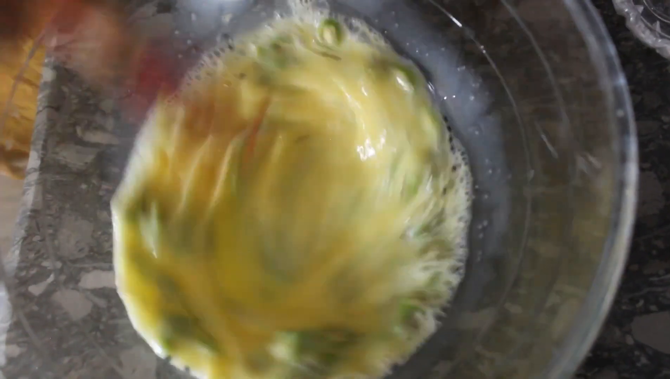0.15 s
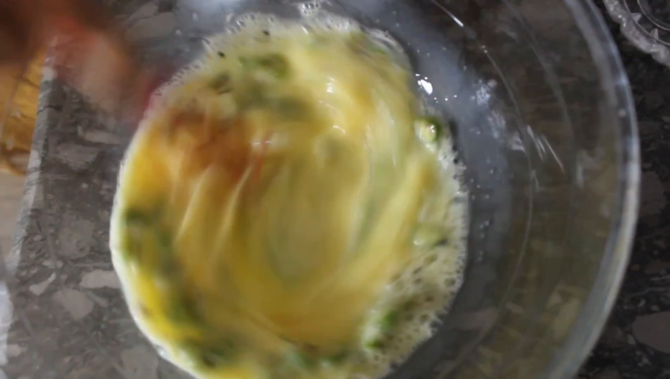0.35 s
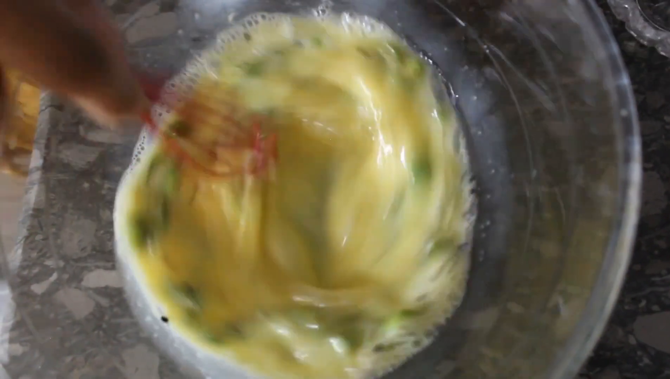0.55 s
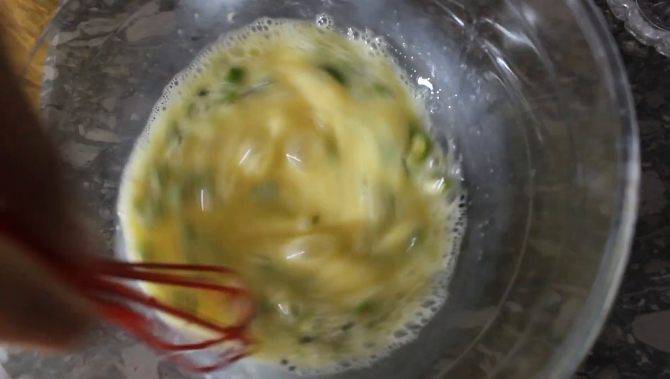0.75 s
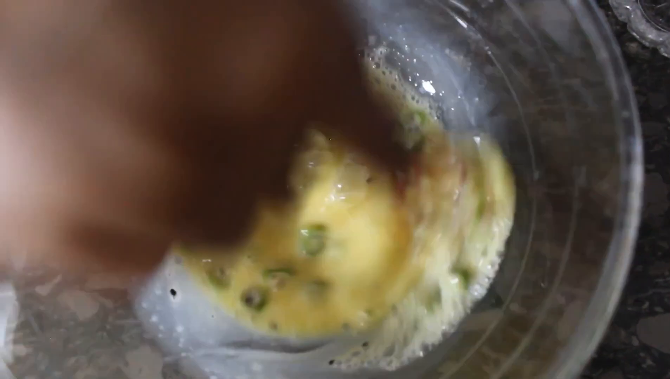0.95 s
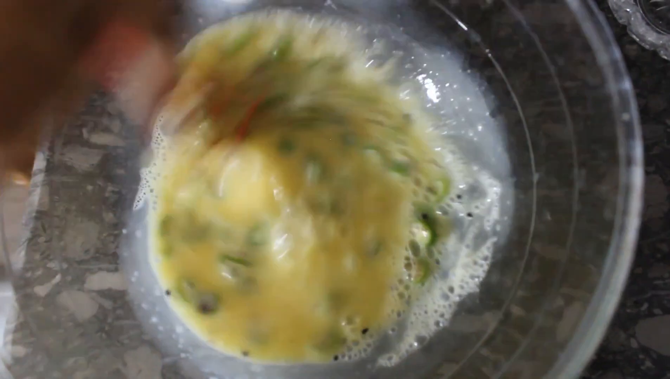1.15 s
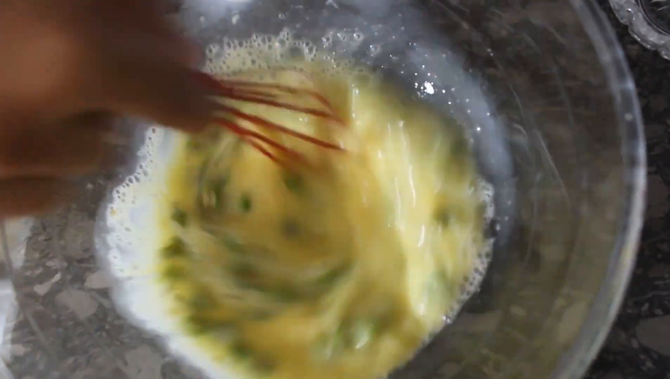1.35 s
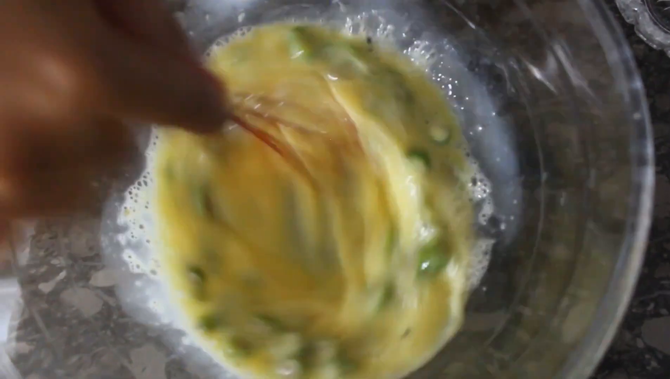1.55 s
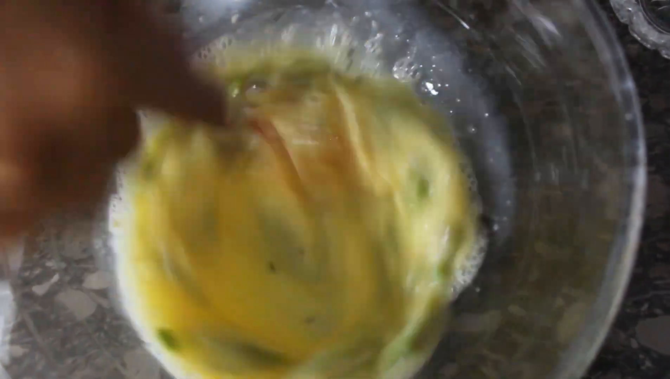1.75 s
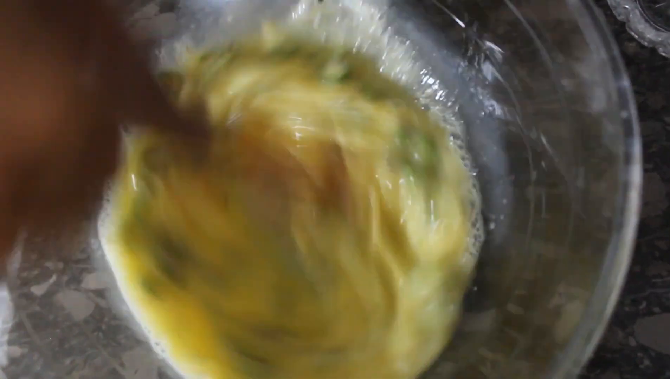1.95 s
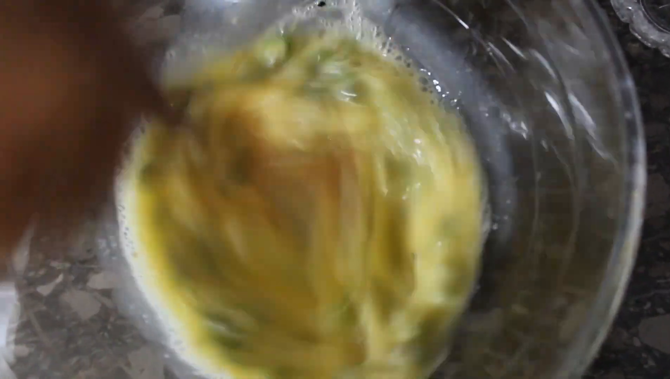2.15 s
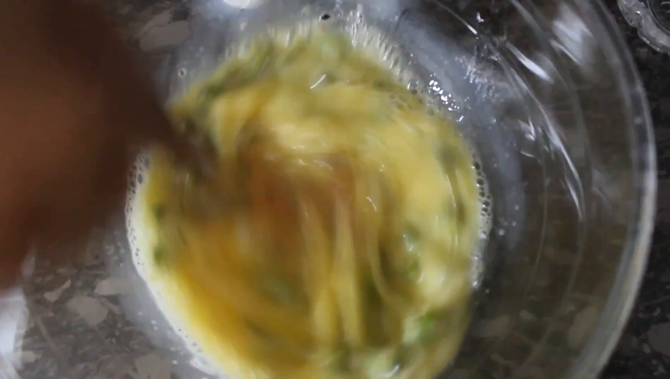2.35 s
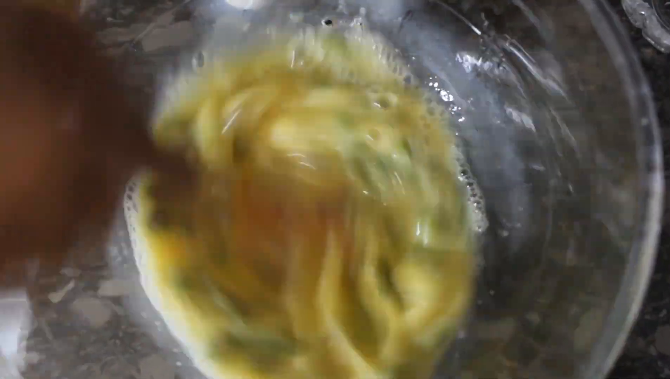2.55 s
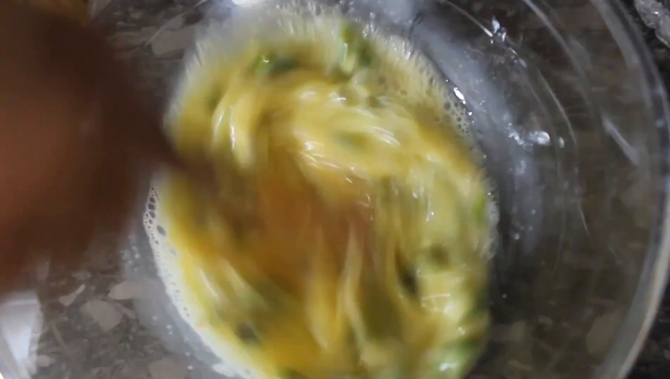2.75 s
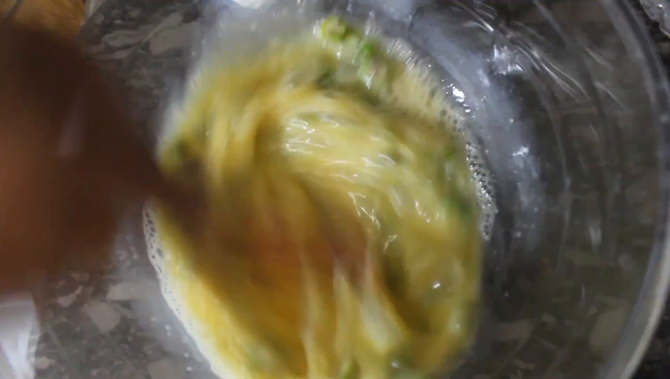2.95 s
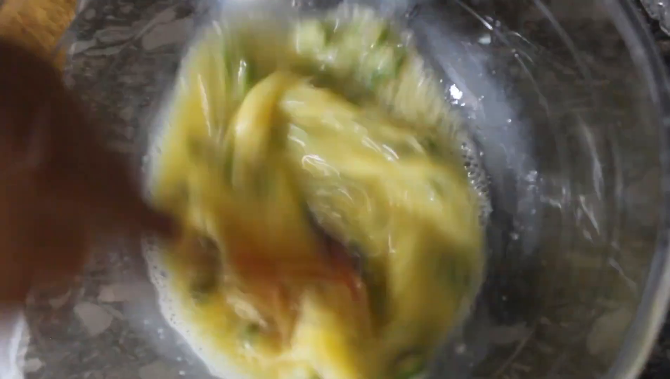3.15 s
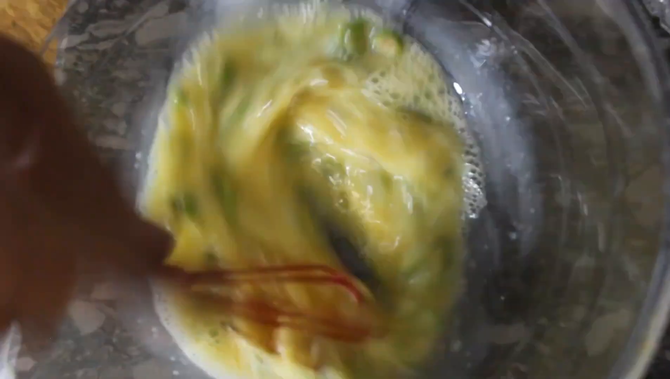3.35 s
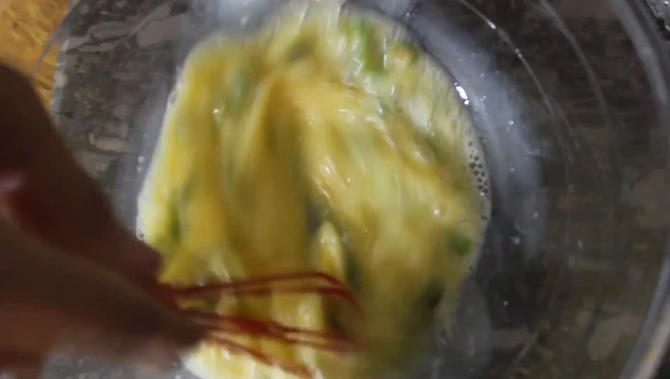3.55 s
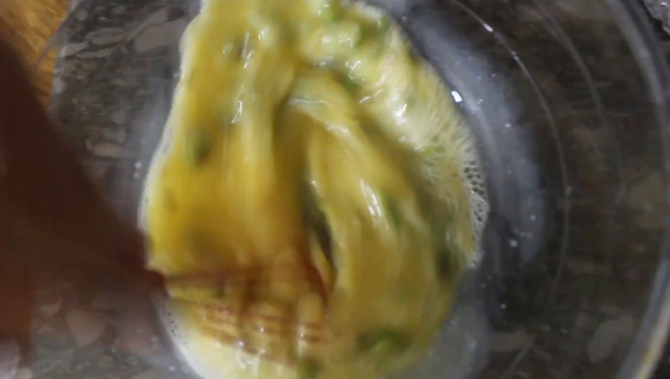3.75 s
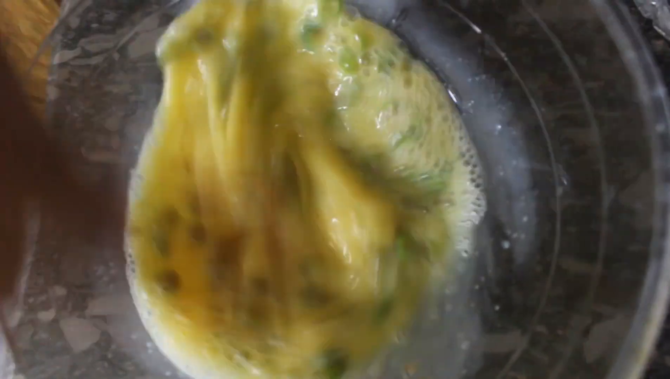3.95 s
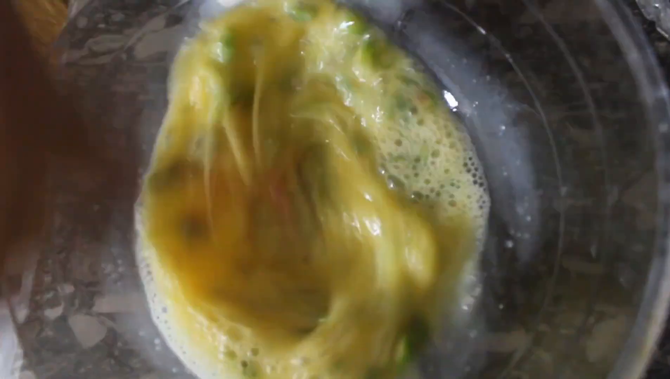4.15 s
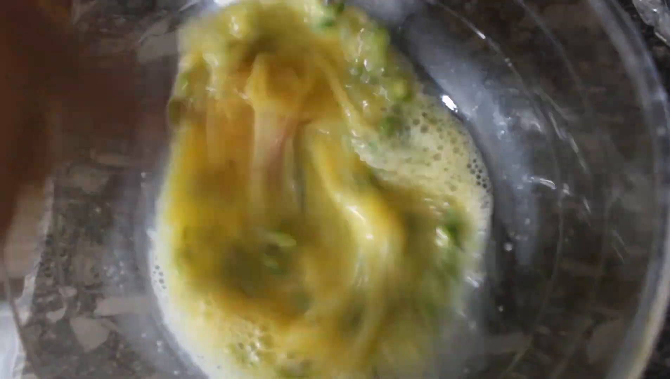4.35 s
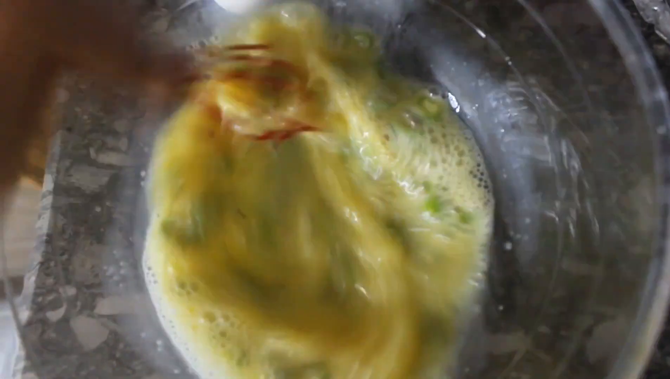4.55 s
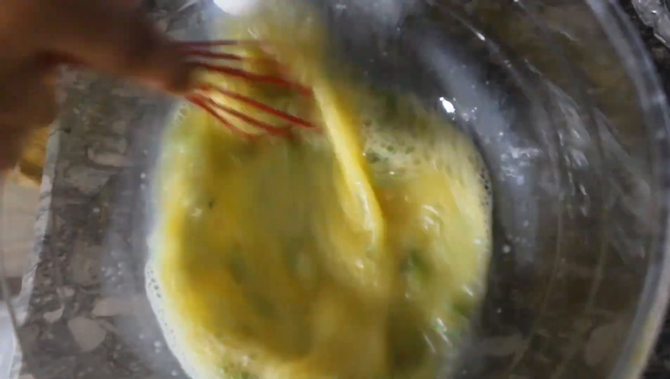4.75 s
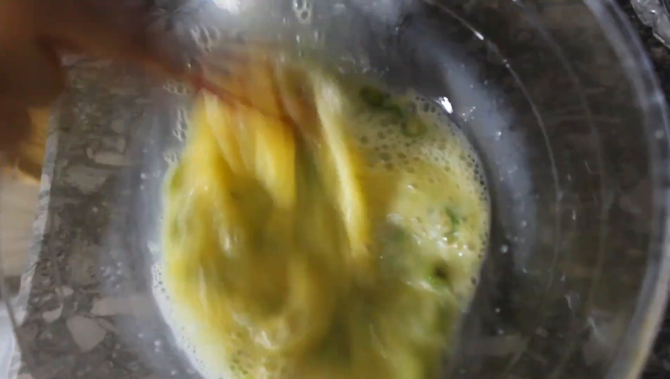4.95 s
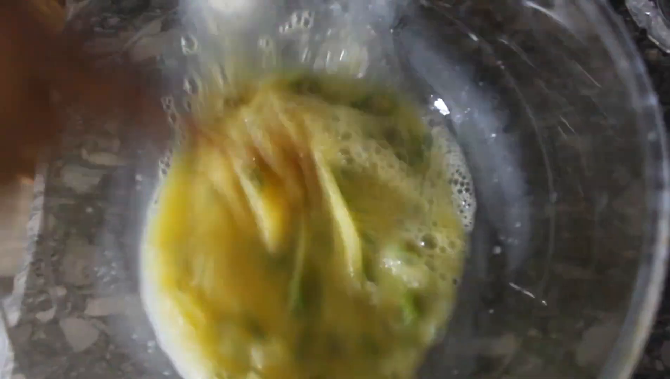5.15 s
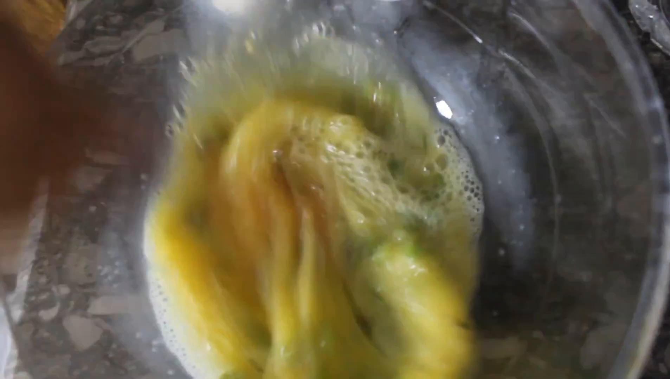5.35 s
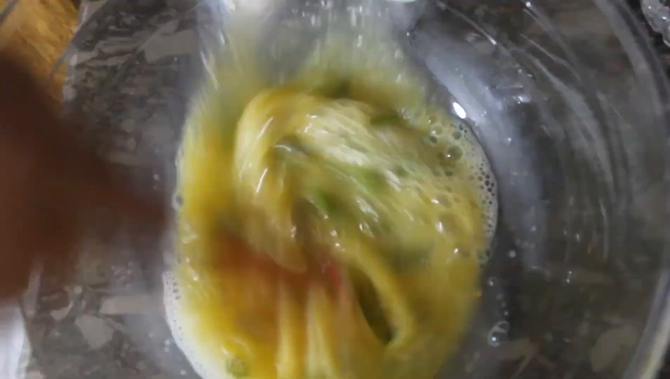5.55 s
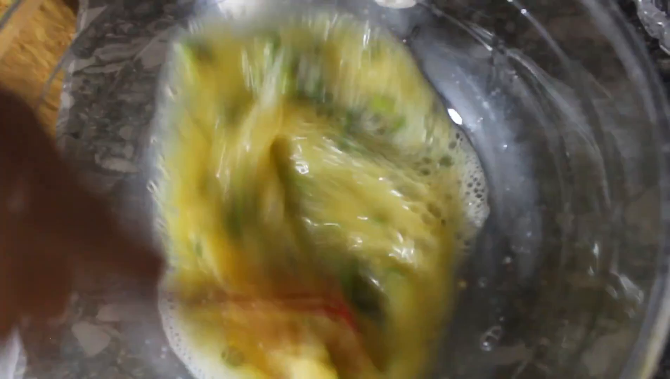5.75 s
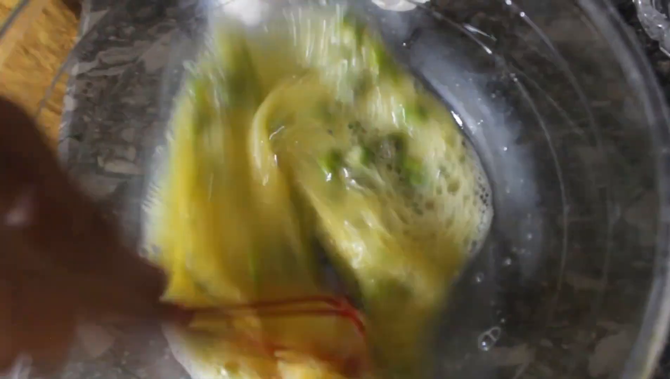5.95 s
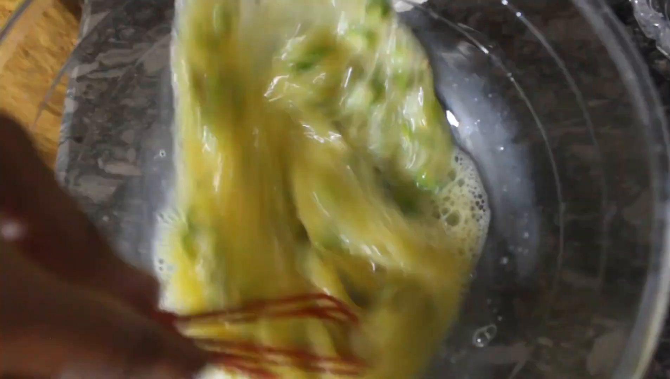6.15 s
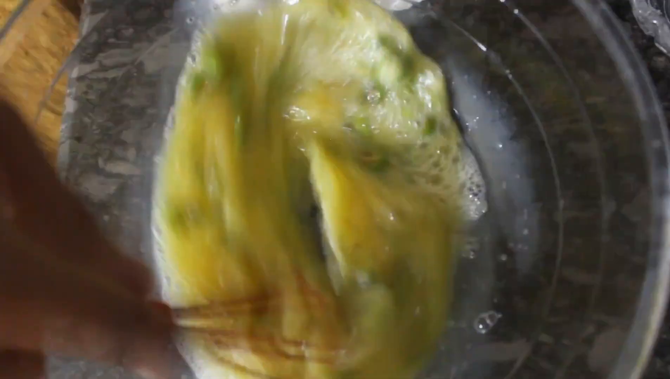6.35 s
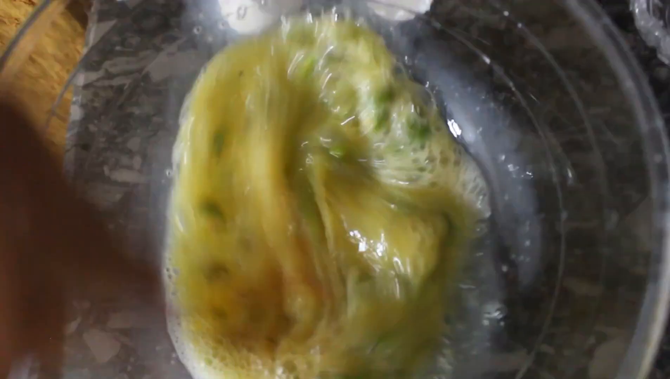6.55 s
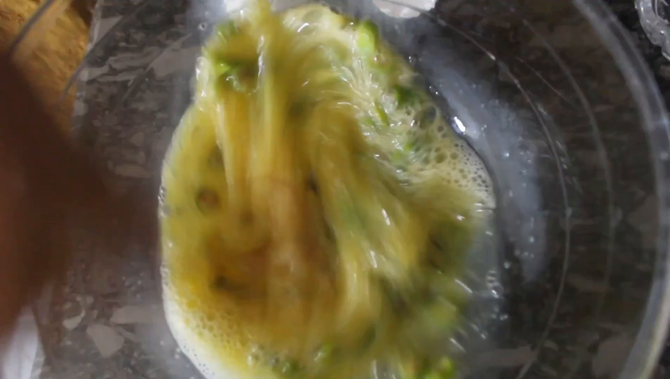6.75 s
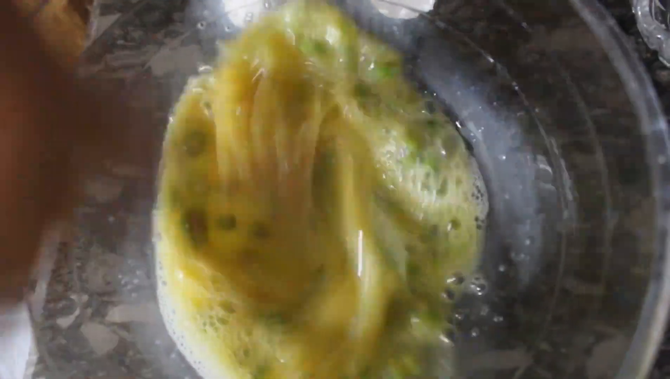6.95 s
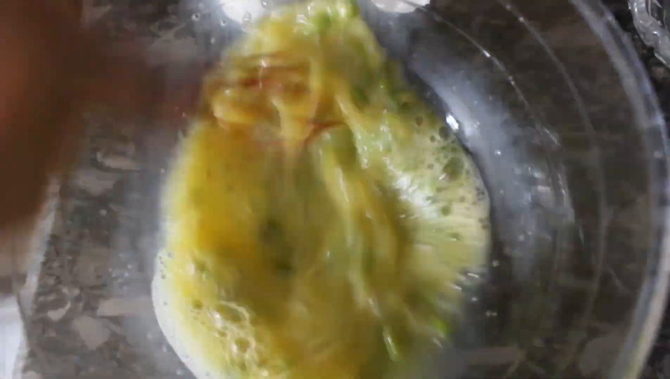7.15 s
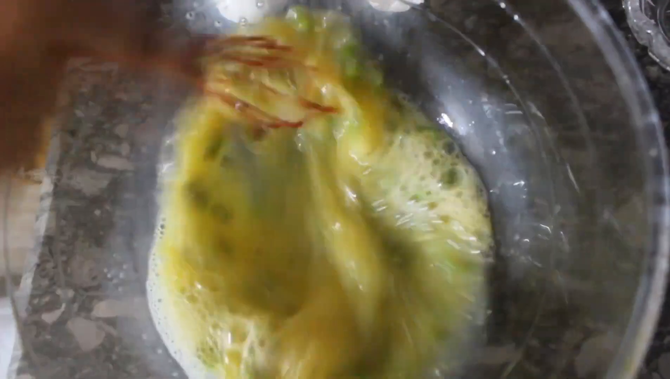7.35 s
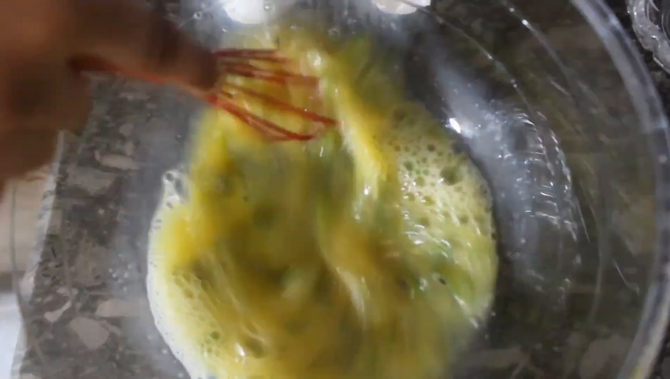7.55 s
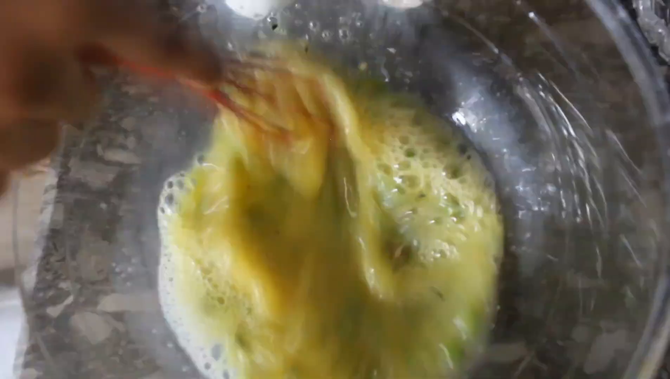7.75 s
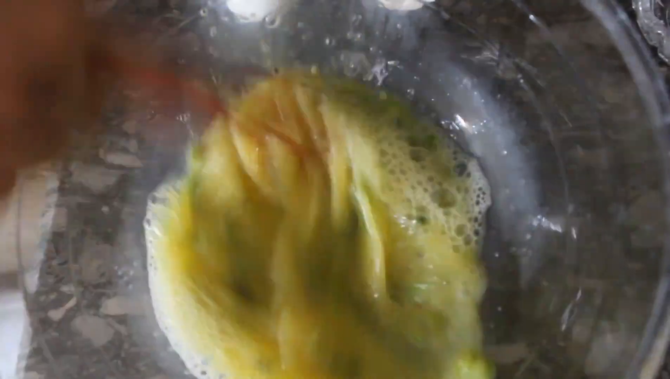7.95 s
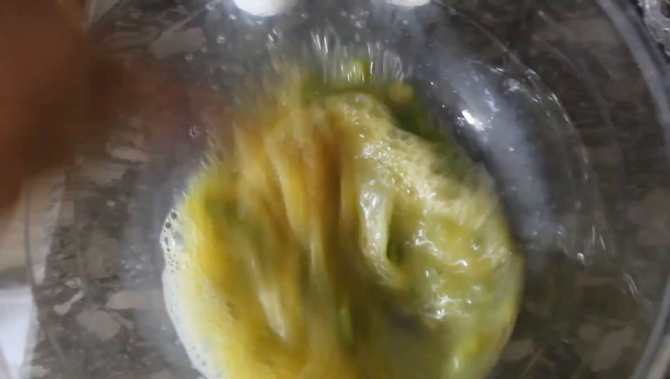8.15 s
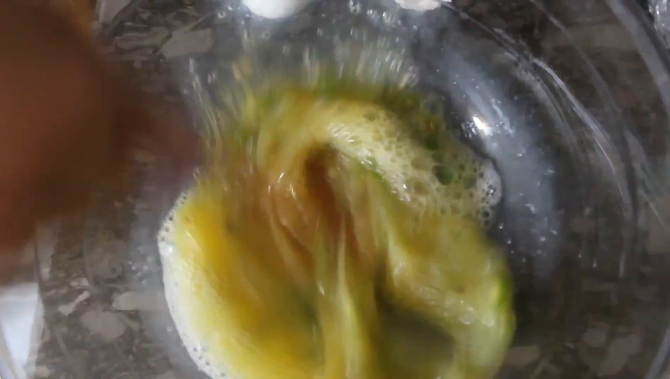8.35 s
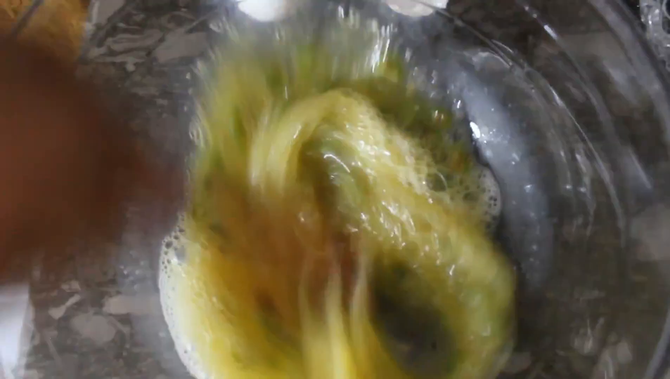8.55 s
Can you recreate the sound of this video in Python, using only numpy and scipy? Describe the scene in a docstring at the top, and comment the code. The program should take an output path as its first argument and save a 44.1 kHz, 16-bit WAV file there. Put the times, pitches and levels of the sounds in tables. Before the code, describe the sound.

A brief clatter like a dropped marble settling on stone opens the scene, then near quiet with tiny drips. Soft whisk passes and a dull bump follow, and from about two seconds eggs are beaten hard and fast in a glass bowl: squelching, fizzy strokes, hollow bubble pops and wire clicks, continuing to the end. Very close microphone, short indoor echo, low kitchen hum, slightly overloaded peaks.

```python
"""In a humming kitchen a wire whisk beats eggs in a glass bowl on a stone counter, heard from close by.
Air pockets pop, wires ping and a few knocks sound as short tones amid a spray of small bubbles.
Something small and hard taps the counter and rattles to rest at the start: a cluster of dying tones.
Noise bursts make sharp ticks: the object's hits and small drips at first, later wire on glass.
Dull bumps and one clink are dying tones too; rumble, hum and room air lie behind, and loud peaks overload."""
import sys
import numpy as np
from scipy import signal
from scipy.fft import rfft, irfft, next_fast_len
from scipy.io import wavfile
from scipy.ndimage import uniform_filter1d

SR = 44100
rng = np.random.default_rng(int(sys.argv[2]) if len(sys.argv) > 2 else 0)


def generate_wav(sig):
    """Save sig (samples, or channels by samples) to the path in sys.argv[1] as 16-bit PCM at SR."""
    pcm = np.round(np.clip(np.atleast_2d(sig).T, -1, 1) * 32767).astype(np.int16)
    wavfile.write(sys.argv[1], SR, pcm)


N = 382781  # length in samples


def gain_of(db):
    """Turns dB into a factor."""
    return 10 ** (np.asarray(db) / 20)


def evened(x):
    """Scales a sound to an rms of 1."""
    return x / np.sqrt(np.mean(x ** 2) + 1e-20)


def read_spectrum(points, hz):
    """Reads a table of (Hz, value) at any frequency, in straight lines along log frequency."""
    f, value = np.transpose(points)
    return np.interp(np.log(hz + 1), np.log(f + 1), value)


def read_over_time(s, values):
    """Reads values given at certain seconds, for every sample of the scene."""
    return np.interp(np.arange(N) / SR, s, values)


def add(mix, s, sound):
    """Adds a sound to the mix at s seconds, cut off at the end of the mix."""
    part = mix[max(round(s * SR), 0):][:len(sound)]
    part += sound[:len(part)]


def coloured(x, spectrum):
    """Filters a sound by a table of (Hz, dB)."""
    size = next_fast_len(len(x))
    gain = gain_of(read_spectrum(spectrum, np.fft.rfftfreq(size, 1 / SR)))
    return irfft(rfft(x, size) * gain, size)[:len(x)]


def ring(hz, t60, glide, rise):
    """A tone with a soft start that falls 60 dB in t60 seconds; a positive glide lifts its pitch."""
    t = np.arange(int(abs(t60) * SR) + 40) / SR
    envelope = (1 - np.exp(-t / rise)) ** 2 * gain_of(-60 * t / t60)
    return envelope * np.sin(2 * np.pi * hz * (t + glide * t ** 2 / t60))


# Short pitched sounds, loud and faint: air pockets popping, wires pinging, a few knocks.
# Each row: start in seconds, peak level in dB, pitch in Hz.
SHORT_TONES = [(.4324, -18, 4200), (0.4996, -21, 4100), (.5346, 0, 1620), (.543, -6.5, 2500),
               (.544, -3.5, 3200), (.6564, -27, 4450), (.7352, -22, 4270), (.995, -17, 2300),
               (1.1376, -13.5, 5240), (1.317, -8, 3460), (1.392, -2, 3850), (1.4566, 0.3, 3750),
               (1.4627, -11, 740), (1.6677, 2, 2920), (1.8376, 1, 2170), (1.901, -11.5, 3060),
               (1.949, -10, 3250), (1.976, -11, 4040), (2.151, 0, 2310), (2.3452, -4, 2300),
               (2.3614, -5.5, 1075), (2.3746, -2, 787), (2.417, -3, 1630), (2.423, -4.5, 1500),
               (2.4248, -3.5, 2300), (2.4437, -3, 3040), (2.457, -8, 920), (2.4624, -2, 2500),
               (2.499, -14.5, 790), (2.551, -16, 2300), (2.5613, -0.5, 3650), (2.632, -9, 900),
               (2.646, -12.5, 910), (2.649, -7, 2100), (2.652, -7, 3840), (2.6705, -4.5, 2140),
               (2.7555, -4, 2180), (2.7678, 0, 4000), (2.8352, -0.5, 2900), (2.842, 1.5, 5670),
               (2.853, -2, 1850), (2.9638, -1.5, 2210), (2.97, -0.5, 4100), (3.0511, -4, 2010),
               (3.167, -2.5, 2840), (3.1717, -7, 760), (3.2592, -2, 2750), (3.2708, -18, 965),
               (3.275, -1.5, 3770), (3.3934, -6.5, 2300), (3.4212, -0.5, 2160), (3.4707, -7, 2390),
               (3.509, -5, 2320), (3.5976, -1, 2370), (3.609, -3, 4450), (3.672, -10.5, 1110),
               (3.7066, -2, 3700), (3.769, -9, 1460), (3.815, -2, 2300), (3.8233, 0.5, 2260),
               (3.845, -26, 770), (3.862, -10, 2350), (3.8803, -8.5, 1730), (3.923, 1, 2430),
               (4.0481, -14, 2240), (4.0583, -6, 4100), (4.084, -10.5, 2050), (4.1495, -7.5, 2440),
               (4.201, -11.5, 2300), (4.245, -7, 2340), (4.2803, -12, 900), (4.3267, -6.5, 1330),
               (4.338, -2, 4240), (4.3509, -10.5, 984), (4.4748, -1, 2310), (4.4771, -11, 940),
               (4.5188, -4, 1160), (4.5429, 0.5, 2840), (4.5586, -4, 2170), (4.5611, -7, 940),
               (4.575, -5.5, 3060), (4.6877, -3, 2350), (4.696, -3, 2620), (4.7345, -5, 2600),
               (4.7829, -4, 947), (4.909, -3.5, 2290), (4.951, -6.5, 1580), (5.0131, -9, 2390),
               (5.057, -1.5, 2640), (5.1313, -3, 2580), (5.1473, -15.5, 755), (5.1984, -6, 3100),
               (5.261, -4, 1940), (5.4574, -16, 1000), (5.3323, -8, 1430), (5.504, -9.5, 762),
               (5.5559, 0, 4200), (5.6452, -5.5, 860), (5.66, -10, 2350), (5.755, -10, 2300),
               (5.7735, 0, 2420), (5.7908, -7, 750), (5.7988, -1.5, 4120), (5.8163, -4.5, 844),
               (5.8395, -5, 2340), (5.8642, -1.5, 866), (5.9102, -4, 2340), (5.9684, -9, 1460),
               (6.048, -7.5, 1010), (6.0505, -2, 2660), (6.0934, -3, 3980), (6.126, -3, 3130),
               (6.135, -3, 874), (6.204, -3, 2740), (6.283, 0, 3680), (6.3163, -7.5, 2270),
               (6.3877, -8.5, 870), (6.4753, -7.5, 748), (6.5022, -6.5, 765), (6.5124, -5, 2120),
               (6.522, -3.5, 2250), (6.631, -5, 2340), (6.676, -1, 2130), (6.837, -1, 2500),
               (6.8424, -7, 780), (6.848, -3, 2370), (6.905, -8, 2880), (6.926, -8, 2310),
               (6.9341, -4, 850), (6.945, -4.5, 975), (6.9637, -3, 2310), (6.9982, -3.5, 870),
               (7.044, -5.5, 1340), (7.044, -3.5, 2210), (7.0629, -10.5, 783), (7.0667, -6, 3860),
               (7.1394, -11.5, 1020), (7.1407, -1.2, 2300), (7.269, -3, 2290), (7.278, 0, 2850),
               (7.3498, -3.5, 2220), (7.3588, -9.5, 2350), (7.4206, -15, 808), (7.4615, -9, 750),
               (7.484, -0.5, 2280), (7.4932, -5, 1700), (7.4935, -12, 860), (7.5524, -5.5, 1800),
               (7.588, -11, 1070), (7.5957, -4, 2270), (7.616, -6, 2360), (7.691, -2, 2260),
               (7.7045, -13, 890), (7.8043, -9.5, 790), (7.858, -8.5, 1460), (7.9185, -7, 2300),
               (7.919, -3, 857), (7.931, -8, 2260), (8.0098, -8.5, 743), (8.0178, -8.5, 1016),
               (8.0285, 1, 2160), (8.086, -10.5, 2300), (8.109, -12, 2300), (8.126, -5, 2430),
               (8.134, 0.5, 894), (8.2143, -12, 920), (8.2378, -10.5, 740), (8.395, -1.5, 1900),
               (8.4444, 0, 2190), (8.4746, -1.5, 2140), (8.561, -4.5, 1115), (8.6421, 1, 4120),
               (8.6465, -8, 1700), (8.648, -6.5, 1150)]
# Pitches near which the glass rings on.
# Each row: pitch in Hz, width in Hz, seconds added to the dying time.
GLASS_WALL = [(773, 24, 0.021), (965, 43, 0.023), (2300, 79, 0.017)]
# Bubbles that chirp upward, and one steady lingering tone. Each row: start in seconds, level in dB,
# starting pitch in Hz, seconds to fall 60 dB, share of the starting pitch climbed in that time.
CHIRPING_TONES = [(1.654, -40, 730, .06, 1.1), (1.843, -4.5, 1440, 0.065, 0.67),
                  (1.85, -16, 1414, 0.19, 0.033), (2.049, -20, 670, 0.087, 1.9),
                  (2.419, -16, 1490, .04, 0.73), (4.04, -25, 880, .05, .8), (5.524, -12, 1440, .06, 1.3),
                  (7.037, -10, 1500, 0.033, .9)]
POP_CYCLES = 22.2  # cycles until a short tone has died away, without the glass


def pops():
    """Pops, pings and knocks ring for a few cycles, longer near the glass's pitches; chirps climb."""
    out = np.zeros(N)
    for s, db, hz in SHORT_TONES:
        glass_s = sum(more * np.exp(-((hz - f) / width) ** 2) for f, width, more in GLASS_WALL)
        pop = ring(hz, POP_CYCLES / hz + glass_s, glide=0.048, rise=0.51 / hz)
        add(out, s, gain_of(db) * pop / abs(pop).max())
    for s, db, hz, t60, climb in CHIRPING_TONES:
        add(out, s, gain_of(db) * ring(hz, t60, glide=climb / 2, rise=0.00059))
    return out


def bubbles(per_s, spread_db, low_hz, high_hz, cycles, linger):
    """A crowd of short tones at random moments, on 24 pitches; a few are much stronger than the rest."""
    happens = rng.random(N) < per_s / SR
    size = gain_of(spread_db * np.minimum(rng.exponential(1, N), 3.5)) * happens
    kind, out = rng.integers(0, 24, N), np.zeros(N)
    for k, hz in enumerate(np.geomspace(low_hz, high_hz, num=24)):
        grain = ring(hz, cycles / hz + linger, glide=0.13, rise=0.35 / hz)
        grain *= np.sqrt(hz) / np.linalg.norm(grain)
        out += signal.oaconvolve(size * (kind == k), grain)[:N]
    return out


# Whisk strokes through the egg.
# Each row: centre in seconds, force in dB, length in seconds (it stretches the swell).
WHISK_STROKES = [(0.795, -28.5, 0.015), (0.898, -28, 0.024), (1.013, -30.5, 0.17), (1.148, -32, 0.041),
                 (1.33, -36, 0.034), (1.388, -21.5, 0.031), (1.472, -22.5, 0.027), (1.532, -21.5, 0.044),
                 (1.619, -23, 0.068), (1.813, -29, 0.077), (1.951, -26, 0.036), (2.039, -26, .03),
                 (2.143, -15, 0.039), (2.244, -17.5, 0.027), (2.352, -16, 0.054), (2.453, -13.5, 0.034),
                 (2.554, -11, 0.04), (2.652, -15, 0.048), (2.76, -10, .039), (2.854, -13.5, 0.047),
                 (2.967, -13.5, 0.062), (3.061, -12, .053), (3.169, -12, 0.05), (3.272, -16, 0.053),
                 (3.395, -22, .12), (3.481, -16.5, 0.062), (3.608, -10, 0.052), (3.696, -13.5, 0.057),
                 (3.768, -17, .015), (3.824, -14.5, 0.036), (3.917, -16, .042), (4.045, -16.5, 0.046),
                 (4.143, -23, 0.052), (4.256, -15, 0.043), (4.339, -16, 0.093), (4.478, -14, .1),
                 (4.56, -10, 0.032), (4.702, -16.5, 0.058), (4.775, -14, 0.061), (4.901, -15.5, .048),
                 (4.955, -15, .017), (5.009, -12, 0.092), (5.14, -16.5, 0.046), (5.214, -12, 0.096),
                 (5.342, -13, 0.053), (5.443, -12, 0.065), (5.562, -9, 0.024), (5.662, -13, 0.068),
                 (5.789, -14, 0.12), (5.878, -14.5, 0.052), (5.996, -15.5, 0.037), (6.093, -16.5, 0.094),
                 (6.209, -8, 0.046), (6.299, -19.5, 0.084), (6.42, -12.5, 0.054), (6.504, -13, 0.06),
                 (6.633, -22.5, 0.069), (6.736, -14, .061), (6.803, -20, 0.026), (6.844, -12.5, 0.046),
                 (6.939, -13.5, 0.093), (7.054, -17.5, 0.039), (7.158, -17, 0.059), (7.277, -18.5, 0.091),
                 (7.371, -15, 0.051), (7.488, -14, 0.045), (7.587, -13.5, 0.092), (7.689, -15, 0.053),
                 (7.794, -16.5, 0.079), (7.867, -10.5, 0.0046), (7.921, -14.5, 0.07), (8.004, -13.5, 0.08),
                 (8.116, -15, .032), (8.23, -18.5, 0.067), (8.342, -18, 0.034), (8.442, -15, 0.064),
                 (8.551, -16, 0.048), (8.653, -15, 0.084)]
# Filter for the coarse bubbles. Each row: frequency in Hz, gain in dB.
SPRAY_COLOUR = [(290, -64), (500, -28), (565, -41), (659, 1), (786, -4.5), (1630, -4.5), (2320, 1.5),
                (2620, -1.5), (4350, -4.5), (7000, -30), (9100, -80), (15400, -120)]
# Filter for the finest bubbles. Each row: frequency in Hz, gain in dB.
FIZZ_COLOUR = [(3500, 10.5), (5500, -1), (8000, -11), (11000, -28.5), (16000, -33)]
FIZZ_DB, FIZZ_SHARE = -24, 0.78  # the fizz follows only part of a stroke's force


def strokes():
    """Spray and fizz swell with each pass of the wires and drain away more slowly."""
    spray_force, fizz_force = np.zeros(N), np.zeros(N)
    for s, db, length in WHISK_STROKES:
        u = np.arange(-SR // 20, SR // 6) / SR / length  # starts 0.05 s before the centre
        swell = np.where(u < 0, np.exp(-(u / 0.23) ** 2), np.exp(-(u / .5) ** 1.18))
        add(spray_force, s - .05, gain_of(db) * swell)
        add(fizz_force, s - .05, gain_of(FIZZ_DB + FIZZ_SHARE * db) * swell)

    coarse = evened(coloured(bubbles(1300, 1.45, 634, 7436, 9.9, 0.015), SPRAY_COLOUR))
    # wires brush the glass where it rings best
    wall = evened(bubbles(250, 1.1, 2180, 2350, 64.0, 0.0032))
    fine = evened(coloured(bubbles(5000, 4.1, 3390, 14600, 10.0, 0.0023), FIZZ_COLOUR))
    # lesser pockets of air
    gulps = evened(coloured(bubbles(200, 2.8, 700, 4500, 24, 0.004), SPRAY_COLOUR))
    # large pockets gulp low
    deep = evened(bubbles(70, 2.5, 678, 1140, 35.0, 0.0066))

    # the egg breaks up in gulps, not evenly
    clumps = uniform_filter1d(uniform_filter1d(rng.standard_normal(N), size=400), size=400)
    spray_force *= gain_of(3.2 * evened(clumps))
    spray = coarse + gain_of(-8.5) * wall + gain_of(-6) * gulps + gain_of(-15) * deep
    return gain_of(-1.5) * spray_force * spray + gain_of(11) * fizz_force * fine


# Sharp ticks: the object's hits and small drips at first, later wire on glass.
# Each row: start in seconds, level in dB before the filter.
SHARP_TICKS = [(0.0581, 10), (0.1101, -30), (0.1306, -22), (0.2244, 9.5), (0.345, -12), (0.4324, -17),
               (0.4993, -31), (0.5433, -5), (0.6564, -27), (0.7352, -36), (0.7944, -28), (0.8954, -36),
               (0.9747, -25), (1.1368, -24), (1.4542, -1), (1.6671, -7), (1.839, 4), (1.8992, -17),
               (2.0393, -3.5), (2.2418, -4), (2.4513, -1), (2.6534, -6), (2.758, 7), (2.8394, -11),
               (3.0827, 9.5), (3.2755, 3), (3.5939, -12), (3.6857, -8), (3.8114, 3), (3.903, -2),
               (4.087, -1.5), (4.153, 0), (4.5017, -3), (4.574, 3.5), (4.696, 0), (4.9872, -9), (5.1215, 2),
               (5.2611, -6), (5.424, 8), (5.5438, 3), (5.7699, -9), (5.87, 2), (6.2045, -14), (6.401, -4),
               (6.5016, -11), (6.6213, -18), (6.9606, 5), (7.0435, -12), (7.148, -3), (7.3134, -19),
               (7.3554, 0), (7.6856, -6), (7.9839, -12), (8.0039, -10.5), (8.427, 2), (8.642, 5)]
# Filter for the ticks. Each row: frequency in Hz, gain in dB.
TICK_FILTER = [(2000, -18), (4500, -8.5), (7000, -13), (10000, -27), (15000, -56)]


def ticks():
    """Each tick is a burst of noise about a millisecond long."""
    out, t = np.zeros(N), np.arange(200) / SR
    for s, db in SHARP_TICKS:
        add(out, s, gain_of(db) * rng.standard_normal(len(t)) * gain_of(-60 * t / 0.01))
    return coloured(out, TICK_FILTER)


# Single taps of the small hard object. Each row: start in seconds, level in dB.
SINGLE_TAPS = [(0.0166, -13), (0.0587, 3.5), (0.134, -12.5), (0.2241, 2.5), (0.6248, -2)]
# How loud its rattle is. Each row: time in seconds, level in dB.
RATTLE_LEVEL = [(.26, -3), (.3, -6.5), (.39, -5.5), (.42, -13), (.45, -16.5), (.52, -26)]
# What the object rings with.
# Each row: pitch in Hz, level in dB against the other pitches, seconds to fall 60 dB.
OBJECT_TONES = [(1750, 0, .0055), (1240, -28, .04), (1500, -26, .04), (1815, -25, .08), (2270, -26, .05),
                (2720, -26.5, .2), (3240, -30, .05), (5550, -50, .1), (12400, -66, .1)]
# The counter's dense ring. Each row: frequency in Hz, gain in dB.
COUNTER_COLOUR = [(300, -9.5), (900, -2), (1800, 7), (4000, -5), (4800, -55), (9000, -63)]
RATTLE_S, FIRST_GAP_S, SHRINK = .2648, 0.027, .826  # start, first gap, factor from gap to gap
LEAST_GAP_S = 0.0066  # times a random 0.77 to 0.9 for each bounce


def rattle():
    """Single taps, then bounces whose gaps shrink like a dropped marble's; each knocks the counter too."""
    least_gaps = LEAST_GAP_S * rng.uniform(0.77, 0.9, size=45)
    gaps = np.maximum(FIRST_GAP_S * SHRINK ** np.arange(45), least_gaps)
    times = RATTLE_S + np.cumsum(gaps) - gaps
    bounces = list(zip(times, np.interp(times, *np.transpose(RATTLE_LEVEL))))

    tap = np.zeros(SR // 4)
    for hz, db, t60 in OBJECT_TONES:
        add(tap, 0, gain_of(db) * ring(hz, t60, glide=0, rise=0.00025))
    tap /= abs(tap).max()
    # a brighter echo of the tap, 3.4 ms later
    add(tap, .0034, ring(2700, .016, glide=0, rise=.0003))

    out, t = np.zeros(N), np.arange(SR // 12) / SR
    knock_shape = (1 - np.exp(-t / 0.00091)) * gain_of(-13.0 - 60 * t / 0.15)
    for s, db in SINGLE_TAPS + bounces:
        counter = evened(coloured(rng.standard_normal(len(t)), COUNTER_COLOUR)) * knock_shape
        add(out, s, gain_of(db) * tap)
        add(out, s, gain_of(db) * counter)
    return out


# Dull bumps of hand and bowl against the counter.
# Each row: start in seconds, peak level in dB, pitch in Hz.
COUNTER_BUMPS = [(1.008, -13.5, 136), (1.027, -14, 170), (2.094, -23, 136), (2.41, -16, 125),
                 (2.44, -21, 140), (5.189, -20, 94), (7.21, -28, 132), (7.226, -22, 160), (7.261, -19, 260),
                 (7.27, -15, 150), (7.313, -19, 191)]
# One clink of the glass.
# Each row: pitch in Hz, level in dB against CLINK_DB, seconds to fall 60 dB.
CLINK_TONES = [(1084, -3, 2.3), (1960, -1, 0.22), (3100, -5, 0.33), (4260, -13, 0.23)]
CLINK_S, CLINK_DB = .795, -29.5  # start in seconds, level in dB


def bumps():
    """Bumps are low pushes of a cycle or two that sink in pitch; the clink is four dying tones."""
    out = np.zeros(N)
    for s, db, hz in COUNTER_BUMPS:
        push = ring(hz, 2.45 / hz, glide=-0.12, rise=0.31 / hz)
        add(out, s, gain_of(db) * push / abs(push).max())
    for hz, db, t60 in CLINK_TONES:
        add(out, CLINK_S, gain_of(CLINK_DB + db) * ring(hz, t60, glide=0, rise=.0002))
    return out


# How long the kitchen echoes. Each row: frequency in Hz, seconds to fall 60 dB.
ECHO_TIMES = [(300, 0.2), (790, 0.21), (2090, 0.094), (5510, 0.044)]


def kitchen(x):
    """The room's echo: sparse clicks of random sign, each band dying at its own speed."""
    clicks = np.zeros(SR // 3)
    at = np.arange(260, SR // 3 - 20, 20)  # one click in every 20 samples
    clicks[at + rng.integers(0, 20, len(at))] = rng.choice([-1., 1.], len(at))
    hz, t, bands = signal.stft(clicks, SR, nperseg=128)
    decay = gain_of(-60 * t / read_spectrum(ECHO_TIMES, hz)[:, None])
    tail = signal.istft(bands * decay, SR, nperseg=128)[1]
    return signal.oaconvolve(x, tail / np.linalg.norm(tail))[:N]


# How loud the background is.
# Each row: time in seconds, level of the air in dB (the rumble follows it), level of the hum in dB.
BACKGROUND_LEVELS = [(0, -29, -30), (.15, -41.5, -57), (.62, -37, -66), (.95, -30, -30.5),
                     (1.66, -28.5, -39), (1.68, -41, -70), (2.35, -33.5, -33), (2.9, -31.5, -54),
                     (3.3, -37, -49), (3.75, -32, -31.5), (4.2, -40.5, -43.5), (4.9, -36.5, -42),
                     (5.35, -29, -41), (5.6, -35, -46), (6.6, -40, -44), (7, -35.5, -50), (7.9, -36.5, -38),
                     (8.68, -32, -45)]
# Filter for the rumble. Each row: frequency in Hz, gain in dB.
RUMBLE_COLOUR = [(12, -51), (20, -8), (32, -4), (60, -9.5), (73, 7), (92, -19.5), (135, 3.5), (303, -5),
                 (381, 1), (559, -12.5), (600, -6.5), (780, -10), (1320, -120)]
# Filter for the room air. Each row: frequency in Hz, gain in dB.
AIR_COLOUR = [(300, -1.5), (600, -4), (900, -0.5), (2000, -3.5), (3000, -11.5), (5000, -29.5),
              (9000, -35.5), (15000, -47.5)]
# The hum's two tones. Each row: pitch in Hz, level in dB against the hum's level.
HUM_TONES = [(64, -1), (129, -5)]
# How freely the egg sloshes. Each row: time in seconds, level in dB against the air.
SLOSH_LEVEL = [(0, 4.5), (.6, 1.5), (.95, -40), (1.1, -3), (2, 3), (2.4, 5), (8.68, 3.5)]
RUMBLE_DB = -5  # rumble against the room air


def background():
    """Filtered noise for rumble and air, a wavering hum and sloshing egg; tables move their levels."""
    s, air_db, hum_db = np.transpose(BACKGROUND_LEVELS)
    air_db, hum_db = read_over_time(s, air_db), read_over_time(s, hum_db)

    # a clock that runs slightly fast and slow makes the hum waver
    waver = evened(uniform_filter1d(rng.standard_normal(N), size=9000))
    clock = np.cumsum(1 + 0.0196 * waver) / SR
    hum = sum(gain_of(db) * np.sin(2 * np.pi * hz * clock) for hz, db in HUM_TONES)

    lumps = gain_of(3.65 * evened(uniform_filter1d(rng.standard_normal(N), size=3000)))
    rumble = lumps * evened(coloured(rng.standard_normal(N), RUMBLE_COLOUR))

    slosh = evened(coloured(bubbles(2500, 2.6, 652, 6670, 6, 0.008), SPRAY_COLOUR))
    slosh += 0.17 * evened(coloured(bubbles(1100, 10.0, 3550, 11000, 2.7, 0.00037), FIZZ_COLOUR))
    air = evened(coloured(rng.standard_normal(N), AIR_COLOUR))
    air += gain_of(read_over_time(*np.transpose(SLOSH_LEVEL))) * slosh
    return gain_of(air_db + RUMBLE_DB) * rumble + gain_of(hum_db) * hum + gain_of(air_db) * air


def scene():
    """Bowl close by; the rattling object has a little less echo."""
    bowl = pops() + strokes() + ticks()
    thing = rattle()
    echo = kitchen(gain_of(-15.5) * bowl + gain_of(-17.5) * thing)
    return (bowl + thing + echo + bumps() + background())[None]


EDGE_HZ = 16000  # the treble ends here


def record(dry):
    """Overload: peaks bend over a knee near full scale; then a low-pass filter ends the treble."""
    bent = dry / (1 + abs(dry) ** 8) ** (1 / 9.5)
    low_pass = signal.firwin(255, EDGE_HZ, window=("kaiser", 9), fs=SR)
    return signal.oaconvolve(bent, low_pass[None], "same")


dry = scene()
out = record(dry)
generate_wav(out)
```